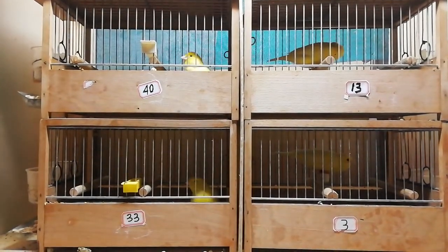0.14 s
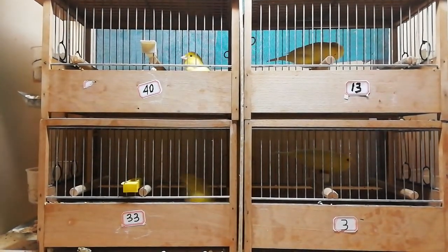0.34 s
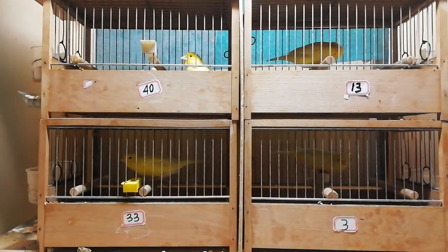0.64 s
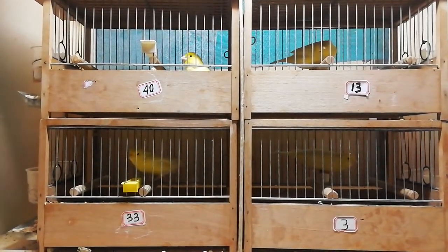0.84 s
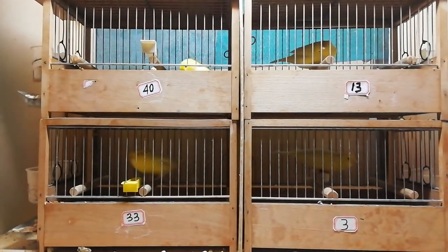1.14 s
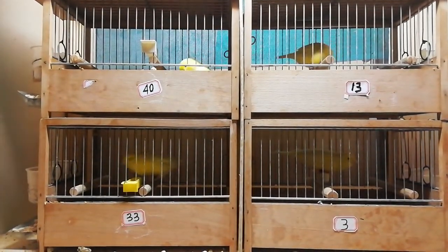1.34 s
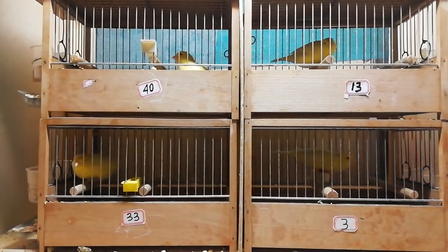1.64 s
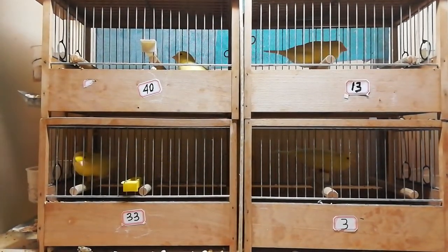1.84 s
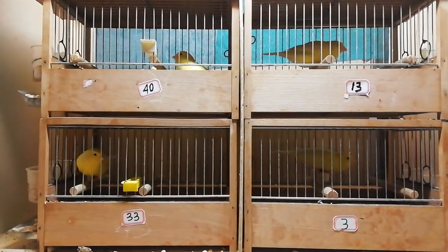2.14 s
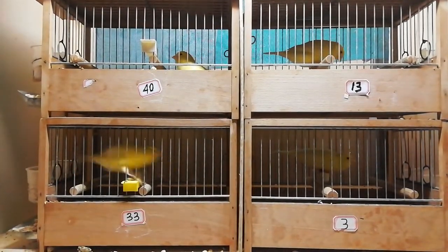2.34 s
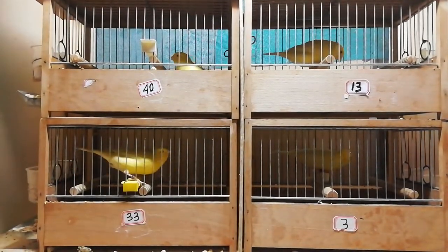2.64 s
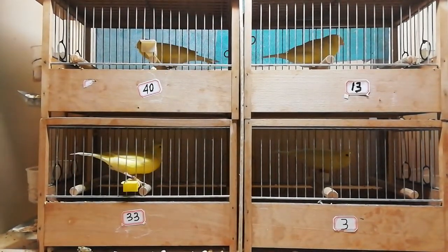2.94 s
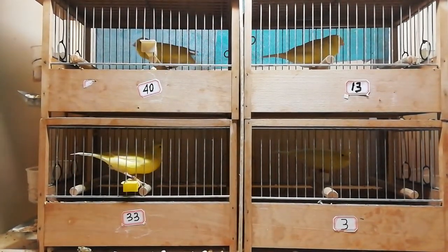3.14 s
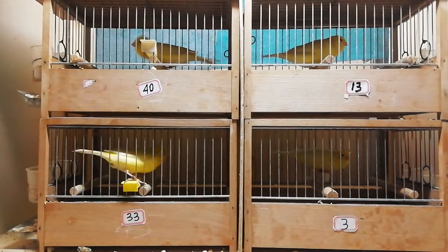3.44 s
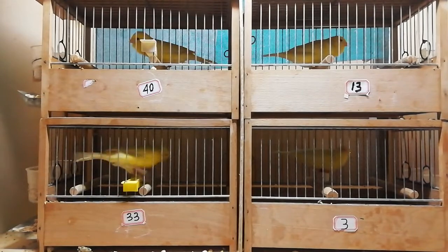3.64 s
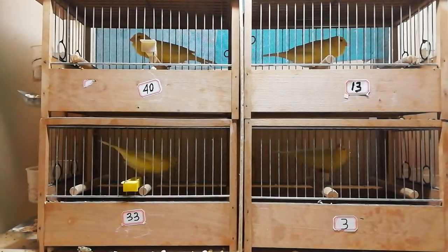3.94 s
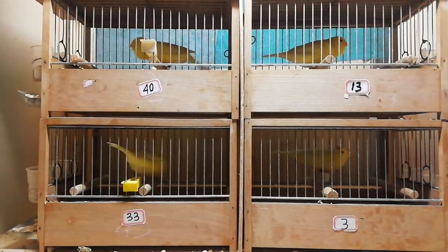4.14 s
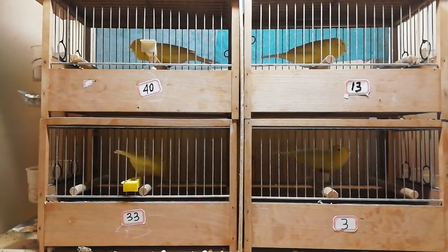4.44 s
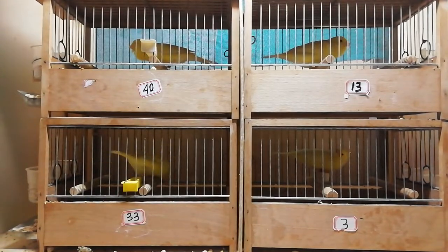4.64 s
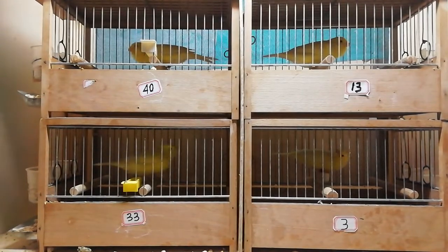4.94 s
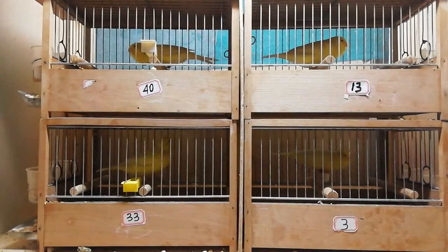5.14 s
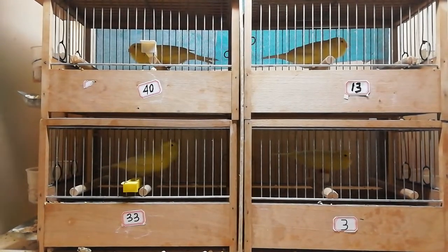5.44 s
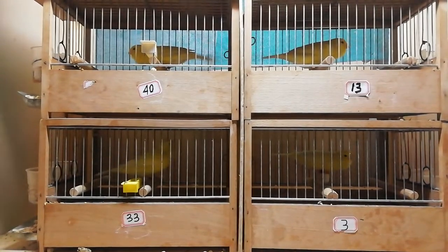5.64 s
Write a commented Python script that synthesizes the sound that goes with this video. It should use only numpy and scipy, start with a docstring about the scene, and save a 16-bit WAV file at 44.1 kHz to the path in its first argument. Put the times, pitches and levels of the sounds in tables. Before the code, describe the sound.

Quiet small-room air with a faint low rumble and mains hum. From about 0.4 to 0.8 s a canary's wings rustle briefly and its feet tap wood and wire. At 0.9-1.1 s comes a quick cluster of short, sliding chirps. Knocks follow at 1.3-1.9 s, the strongest near 1.65 s with a thin wire ring, then more chirps until 2.2 s. A busy flurry of hops, scrapes and feathers fills 2.25-2.5 s, with a few isolated chirps after it. At 3.0 s a fast trill of whistled notes around 2 kHz fades in; higher even pips join from 3.3 to 3.85 s. From 3.9 s hollow, lower notes from a third bird overlap, with a burst of quick notes near 4 s. The dense roll peaks around 4-4.9 s over soft cage thuds, drops lower and softer after 5.2 s, then strengthens again and continues to the end, near 5.8 s.

```python
"""A low rumble and a mains hum lie under faint room air, with hops on perch and wire and calls among them.
Three canaries in stacked wooden cages then trill over each other, heard at two microphone ports nearby.
Songs and calls are gliding near-sines with overtones; struck wood and wire ring as decaying modes.
Wings are noise in grains and a low boom; a diffuse tail lets the small room ring on."""
import sys
import numpy as np
from scipy import signal
from scipy.fft import rfft, irfft
from scipy.io import wavfile
from scipy.ndimage import uniform_filter1d

SR = 44100
rng = np.random.default_rng(int(sys.argv[2]) if len(sys.argv) > 2 else 0)


def bounce(signal):
    """Save signal as a 16-bit WAV file at the path given by the first command-line argument."""
    frames = np.transpose(np.atleast_2d(signal))
    limited = np.clip(frames, -1, 1)
    pcm = np.round(limited * 32767).astype(np.int16)
    wavfile.write(sys.argv[1], SR, pcm)


N = 254898

# Spectrum of the room air: pitch_hz, relative_db
AIR_COLOUR = [(100, -37), (170, -8), (202, 5.5), (331, -22.5), (432, -17), (466, -19), (681, -26),
              (749, -18), (872, -21.5), (1300, -19.5), (7770, -30.5), (16000, -37)]
AIR_DB = -68.5
# Rumble along time: time_s, level_db
RUMBLE_LEVEL = [(0, -71.5), (1.2, -70.5), (2.5, -69), (3.4, -70.5), (3.86, -63), (4.38, -70), (4.65, -63.5),
                (4.86, -59.5), (4.93, -69.5), (5.3, -66), (5.78, -65)]
# Spectrum of the rumble: pitch_hz, relative_db
RUMBLE_COLOUR = [(8.8, -29), (15, 26), (54, -6), (86, 5.5), (129, -5), (155, 1), (172, -5), (185, -5),
                 (240, -5), (410, -120)]
RUMBLE_SWELL_DB, RUMBLE_SWELL_S = 1.5, 0.094
# Mains partials: pitch_hz, level_db
MAINS_HUM = [(199.5, -68.5), (299.5, -83.5)]

# Reverberation time: pitch_hz, t60_s
ROOM_T60 = [(300, 0.42), (2000, 0.35), (9000, 0.22)]
ROOM_ONSET_S, ROOM_BUILD_S = 0.002, 0.0081  # the first walls answer late, then the tail builds up
ROOM_TILT_DB = -1.5  # per octave above 2 kHz: the tail is duller than the direct sound
SINGER_ROOM_DB, CALL_ROOM_DB, HOP_ROOM_DB = -8, -5.5, -4.5

# Wings brushing the cage: start_s, level_db, held_s, fade_db_per_s
WING_BRUSH = [(.438, -47.5, 0.0032, 313), (.502, -50, 0.0033, 216), (1.432, -66.5, .01, 80),
              (1.572, -63, 0.0046, 250), (1.86, -62.5, 0.077, 198), (2.272, -52.5, 0.043, 250),
              (2.428, -47.5, 0.0041, 282)]
# Wing strokes booming in the cage box: start_s, level_db, held_s, fade_db_per_s
WING_BOOM = [(.492, -82, .005, 400), (.538, -65, .005, 180), (2.272, -70, 0.05, 240),
             (2.476, -45, 0.002, 384), (3.78, -65.5, 0.12, 154), (4.09, -66, 0.04, 200)]
BRUSH_RISE_DB_PER_S, BOOM_RISE_DB_PER_S = 2500, 400
# Spectrum of rustling feathers: pitch_hz, relative_db
RUSTLE_COLOUR = [(290, -23), (500, 19), (595, -59), (831, 4.5), (2070, 3), (2810, -4.5), (8210, 0),
                 (16000, -34)]

# Feet and beak on perch, floor and wire: start_s, level_db, wire_ring_db,
# scrape_db (claws and seed), left_minus_right_db, knock_brightness_db_per_octave
HOPS = [(0.295, -89, -8, -30, 4, 2), (0.38, -65, -23.5, -14, 5, 2.5), (0.428, -53, -20, -10, -1, 1),
        (0.437, -49, -12, 13, 5, 6.5), (0.461, -52, -16, -14, 1, -3), (0.5011, -42.5, -9, 13, -1, 6),
        (0.61, -55.5, -0.5, -3, 1, 4.5), (0.621, -59, -22, -28, -3, -9), (0.676, -52, -25, -25, 0, -8.5),
        (0.822, -57, -23, -13, 4, -4), (1.296, -69, -16, 26, 1, 4), (1.376, -50, -16, -25, 1, -1),
        (1.392, -50, -25, -30, -1, -4), (1.425, -50, -26, -34, 1.5, 6.5), (1.453, -53, -29, -26, -13, -8),
        (1.569, -42.5, -8, -25, 0, -0.5), (1.648, -34, -1.5, -35, 0.5, -9),
        (1.854, -52.5, -6.5, -24, 2, -5), (2.267, -40.5, 3.5, -23, 0, 5), (2.288, -43, -20, -30, 6, -8),
        (2.306, -36, -1.5, -12, -2.5, -8), (2.325, -59, -20, -30, 7, -8), (2.345, -43, -20, -30, 3, -6),
        (2.365, -36, 1.5, -14, 1.5, 2.5), (2.3995, -42, 6, 20, -1.5, -8), (2.408, -45, -4, 22, -4, -2),
        (2.428, -52, -5.5, -3, -1, -0.5), (3.731, -49.5, -5, 31, 1, 9.5), (3.891, -38, -6, 17.5, -1, -5)]
# Modes of the wood: pitch_hz, level_db, t60_s
WOOD_MODES = [(825, -22, 0.089), (944, -4.5, 0.076), (1078, -7.5, 0.034), (1212, 1, 0.018),
              (1423, -7, 0.034), (1580, -4.5, 0.048), (2170, -22, 0.022), (2744, -11.5, 0.025),
              (3090, -5, 0.0092)]
# Modes of the wire: pitch_hz, level_db, t60_s
WIRE_MODES = [(4640, -3, 0.0035), (6100, -28, 0.34), (6450, -5.5, 0.012), (7820, -12.5, 0.065),
              (8030, -20.5, 0.11), (9000, -25, 0.2)]
CONTACT_S = .0025  # decay time of a foot's push
# A mode's twin over its pitch, scatter of that ratio, scatter of a mode's level in dB
TWIN_RATIO, TWIN_SCATTER, MODE_SCATTER_DB = 1.012, .004, 2
# Soft landings booming in the cage box: start_s, level_db, pitch_hz
THUDS = [(0.514, -45.5, 466), (.83, -62.5, 468), (1.571, -45, 483), (1.594, -44, 274), (1.857, -55, 489),
         (2.29, -52, 340), (2.37, -51, 390), (2.43, -49, 294), (3.815, -47, 479), (3.906, -54, 506),
         (4.069, -41, 497), (4.116, -52.5, 424), (4.21, -56, 510), (4.459, -52, 457), (4.804, -49.5, 447),
         (5.144, -50.5, 470), (5.382, -56, 490), (5.699, -73, 444)]
THUD_GRAIN_DB = -8.5  # rattle of the floor around the pitch of a landing
# Loose wires of the cage front humming on: start_s, level_db, pitch_hz
LOOSE_WIRES = [(.503, -73, 1900), (1.578, -63, 1910), (1.655, -55.5, 1882), (1.65, -63, 6230),
               (1.862, -66, 1940), (2.27, -64, 6100)]
LOOSE_T60_S, LOOSE_BEAT_HZ = .55, 21.9

# Calls and other short chirps: start_s, level_db, end_pitch_hz, length_ms, start_over_end_pitch, bend,
# octave_db, left_minus_right_db
CALLS = [(0, -63, 1200, 32, 1.5, 1.85, -23, -4), (.01, -72, 1894, 67, 1, 1.3, -15, 7),
         (.917, -43.5, 2477, 84, 0.93, 9.2, -16.5, 5), (0.958, -36.5, 2160, 19, 1.1, 0.83, -18, 11),
         (0.984, -36.5, 2540, 22.5, 0.89, 1.4, -21, 6), (0.999, -38.5, 1570, 7.4, 1.43, 1.22, -6.5, -7),
         (1.021, -39, 2340, 21, 0.88, 5.1, -21, -2.5), (1.032, -41, 1232, 13, 1.7, 6.4, -13, 13),
         (1.065, -37.5, 1947, 9.2, 1.08, 0.64, -10.5, 5), (1.074, -38, 1228, 10.2, 1.44, 4.2, -11, 8.5),
         (1.871, -61, 1126, 12.6, 2, 1.9, -19, -25), (1.896, -52.5, 1860, 30.4, 0.66, 4.8, -6.5, -22),
         (1.941, -39.5, 2140, 22.4, 0.52, 2.63, -5.5, 6.5), (1.99, -42, 2565, 31, 1.01, 1, -15, 5.5),
         (2.024, -58, 2650, 46, 1.07, 1.4, -37, 19), (2.156, -40.5, 1690, 11, 0.88, 1.14, 6, -3.5),
         (2.165, -36, 2212, 22.8, 0.79, 4.6, -3, -9), (2.258, -50, 2200, 22, .98, 1.5, -20, -2),
         (2.438, -38.5, 2080, 13.4, 0.93, 1.5, -16, 8), (2.463, -49, 1472, 44, 1.26, 0.6, -11, 6),
         (2.612, -49.5, 1872, 33, 1.1, 5, -7.5, 6), (2.928, -62, 2540, 12.5, 1.13, 2.7, -10, -16),
         (3.213, -41.5, 1810, 19, .9, 1.6, -14, -1), (3.865, -35.5, 2030, 16.7, 0.81, 2.05, -0.5, -5)]
# Third and higher partials of a call: level_db
CALL_UPPER_DB = [-21, -25.5, -69]
CALL_LAG = 30  # samples by which the left port lags
BREATH_BAND = signal.butter(3, [2600, 9800], "band", fs=SR)

# A trill is a curve through some of its notes; each *_NUMBER lists the note number of every row,
# and the notes in between follow evenly.
# First singer, main note of the syllable: start_s, level_db, pitch_hz
ROLL_CURVE = [(3.032, -48, 2160), (3.075, -43, 2000), (3.1123, -37.5, 1980), (3.236, -31.5, 2130),
              (3.3185, -29.5, 2170), (3.3985, -30.5, 2203), (3.6001, -27, 2127), (3.8106, -29, 2260),
              (3.8881, -29, 2290), (3.9255, -26, 2015), (3.9519, -25.5, 2167), (3.9948, -21.5, 2055),
              (4.035, -26, 2037), (4.1905, -22, 2053), (4.3865, -21, 2029), (4.592, -22.5, 2035),
              (4.804, -22.5, 2090), (4.8922, -24, 2175), (5.0128, -28.5, 2084), (5.2194, -31.5, 2065),
              (5.3137, -37, 1740), (5.49, -35, 1740), (5.578, -35, 1745), (5.621, -29.5, 1726),
              (5.664, -26, 1794), (5.708, -29, 1890), (5.7505, -27, 1910)]
ROLL_NUMBER = [0, 1, 2, 5, 7, 9, 14, 19, 21, 22, 23, 24, 25, 29, 34, 39, 44, 46, 49, 54, 56, 60, 62, 63, 64,
               65, 66]
# Shape of the syllable along the song: time_s, main_note_ms, start_over_end_pitch,
# bend (under 1 the glide comes late), flick_db (high flick against the cluck), cluck_brightness_db_per_partial
ROLL_SHAPE = [(3.03, 14, 1.1, 1.1, -30, 4), (3.08, 13, 1.07, 1.1, -30, 2), (3.115, 11, 1.1, 1.2, -30, 0),
              (3.155, 12, 1.02, 2, -30, -2), (3.199, 13, 0.92, 2.5, -30, -4), (3.24, 13, .75, 5, -30, -8),
              (3.316, 12, 0.6, 6, -30, -14), (3.848, 12.4, .55, 3.13, -26, -13),
              (3.952, 12, 0.84, 2, -3, -7.5), (4.11, 9, 0.85, 2, -3, -6), (4.19, 9.5, 0.86, 2, -2, -5),
              (4.23, 11.5, 0.87, 2, -2, -5), (4.5, 11.5, 0.85, 2.75, -1, -3),
              (5.201, 13.2, 0.613, 1.22, 8, 0), (5.301, 13, 1.03, 1.4, -37, -5),
              (5.62, 12, 1.02, 1.4, -37, -5.5), (5.78, 16, 0.97, 2.3, -30, -5)]
# First singer's throat along the song: time_s, main_note_octave_db, lead_in_db
ROLL_THROAT = [(3.03, -42, -35), (3.08, -0.5, -21), (3.12, 1.5, -20), (3.28, -11.5, -15),
               (3.45, -15.5, -11.5), (3.82, -12.5, -14), (3.9, -17, -8), (4.6, -23, -11.5),
               (5.0, -19.5, -7), (5.25, -2, 2.5), (5.35, -5, 8), (5.78, -9.5, -5)]
# First singer, short falling cluck closing a syllable: start_s, level_db, fundamental_db
CLUCK_CURVE = [(3.815, -38, -2.5), (3.896, -40.5, -2), (3.938, -48, 9), (4.101, -44, 7), (4.373, -46, 6),
               (4.621, -45, 1), (4.873, -49.5, -9), (5.07, -51, 3.5), (5.21, -60, 7), (5.29, -43, 7),
               (5.331, -42, 2), (5.46, -42, 3), (5.548, -42, 4.5), (5.632, -42, 2), (5.759, -42.5, 5.5)]
CLUCK_NUMBER = [0, 2, 3, 7, 14, 20, 26, 30, 33, 35, 36, 39, 41, 43, 46]
# Second singer, high even notes: start_s, level_db, pitch_hz
PIPE_CURVE = [(3.317, -34.5, 2276), (3.511, -27.5, 2389), (3.853, -26, 2345)]
PIPE_NUMBER = [0, 4, 11]
# Second singer, burst of quick low notes: start_s, level_db, pitch_hz
QUICK_CURVE = [(3.975, -29, 2000), (4.015, -30, 2100), (4.057, -33, 1905), (4.096, -29, 1965),
               (4.133, -30.5, 1930)]
QUICK_NUMBER = [0, 1, 2, 3, 4]
# Third singer, hollow notes with a strong octave: start_s, level_db, pitch_hz, length_ms,
# octave_over_fundamental_db
BELL_CURVE = [(3.905, -34, 1417, 22, 9.5), (3.947, -32, 1345, 23, 4.5), (4.09, -33, 1280, 25, 4.5),
              (4.135, -30.5, 1266, 17, 0), (4.405, -31.5, 1284, 26, 7), (4.542, -30, 1340, 12.4, 2),
              (4.676, -30.5, 1322, 25, 5.5), (4.8175, -32, 1274, 20, 6.5), (4.955, -29, 1310, 15.7, 4.5),
              (5.1928, -32.5, 1324, 31.7, 3.5), (5.24, -31.5, 1380, 32.6, 9.5), (5.288, -24, 1357, 16, 1),
              (5.3846, -35, 1326, 34, 3.5), (5.5313, -33, 1344, 24.6, 7.5), (5.628, -30, 1319, 11, 7.5),
              (5.676, -28.5, 1288, 19, 7), (5.723, -33, 1272, 27.6, 12.5)]
BELL_NUMBER = [0, 1, 4, 5, 11, 14, 17, 20, 23, 28, 29, 30, 32, 35, 37, 38, 39]
# Third singer's throat along the song: time_s, third_partial_db, closing_flick_db
BELL_THROAT = [(3.9, -13, -9), (4.2, -16, -14), (4.6, -9.5, -17), (5.0, -11.5, -13), (5.25, -11.5, -10.5),
               (5.5, -11, -7), (5.62, -11, -8), (5.78, -14, -17)]
# Partials, level_db: roll from the third, cluck from the second, lead-in, pipe and quick from the first;
# bell has the fundamental, then the fourth and above
ROLL_UPPER_DB = [-26.5, -23.5, -47.5, -63]
CLUCK_UPPER_DB = [16, 13.5, -1, -60]
LEAD_PARTIALS_DB = [-4, -10.5, -26.5]
PIPE_PARTIALS_DB = [-3, -29.5, -25, -48, -56]
QUICK_PARTIALS_DB = [-0.5, -11.5, -22, -18]
BELL_PARTIALS_DB = [-8.5, -25.5, -23.5, -28]
STRAY_S, STRAY_DB, STRAY_SHARE = .0007, 1.6, .01  # scatter of a note: time, level, share of the third column
STEADY = .004  # pitch wobble (share) of held whistles
# Each singer's place: left_lag_samples, wall_echo_delay_s (right port), wall_echo_db, room_left_minus_right_db
PLACES = [(28, .017, -14, -2.5), (-28, .012, -14, -1.5), (30, .014, -16, -4)]
# Where each head points: time_s, then direct left_minus_right_db of first, second, third singer
FACING = [(3.0, -4.5, 4, -7), (3.8, 0, 4, -27), (3.95, 2, 4, -1.5), (4.4, 0, 4, -5), (4.6, 1, 4, -2),
          (5.2, -0.5, 4, -0.5), (5.6, 11.5, 4, -10), (5.72, -2.5, 4, -1)]
SWAY_PER_S = 5  # how often a singing head moves enough to change what the room returns

# Colour of the two ports: resonance_hz, sharpness_q, share_added_left, share_added_right
PORT_COLOUR = [(8170, 3.6, -0.57, 1), (4700, 3.3, 0.29, -0.2), (1180, 0.65, -0.43, -0.018)]
TOP_HZ = 15900


def undb(db):
    """Gain is the antilogarithm of a level in decibels."""
    return 10 ** (np.asarray(db) / 20)


def add(out, s, x):
    """Superposition: x is summed into out from time s."""
    i = max(int(s * SR), 0)
    out[..., i:i + x.shape[-1]] += x[..., :out.shape[-1] - i]


def pan(db):
    """Level difference: left minus right in dB is split evenly over both gains."""
    return undb([[db / 2], [-db / 2]])


def along(table, s):
    """Linear interpolation of every column of a table over its first."""
    at, *columns = np.transpose(table)
    return [np.interp(s, at, column) for column in columns]


def decay(t, t60):
    """Exponential decay: the level falls by 60 dB in t60."""
    return 1000 ** (-t / t60)


def band(x, lo_hz, hi_hz):
    """Band limitation by a second-order Butterworth band-pass."""
    return signal.lfilter(*signal.butter(2, [lo_hz, hi_hz], "band", fs=SR), x)


def coloured(table, lo_hz, hi_hz):
    """Interaural coherence: shaped noise, rms 1, alike in the bass and unrelated in the treble."""
    f = np.fft.rfftfreq(N, 1 / SR) + 1e-9
    hz, db = np.transpose(table)
    gain = undb(np.interp(np.log(f), np.log(hz), db)) * (f > lo_hz) * (f < hi_hz)
    mid, side = rfft(rng.standard_normal((2, N))) * gain
    side = side * np.clip((f / 450) ** 2, .05, 1)
    x = irfft(np.array([mid + side, mid - side]), N)
    return x / x.std()


def room(x, db):
    """Diffuse reverberation: each ear has its own noise tail, whose octave bands die at their own rate."""
    t, tail = np.arange(SR // 2) / SR, 0
    hz, t60 = np.transpose(ROOM_T60)
    for f in 140 * 2. ** np.arange(7):
        edges = [f / np.sqrt(2), f * np.sqrt(2)]
        octave = signal.butter(2, edges, "band", fs=SR, output="sos")
        noise = signal.sosfilt(octave, rng.standard_normal((2, len(t))))
        tilt = undb(ROOM_TILT_DB * max(np.log2(f / 2000), 0))
        tail = tail + tilt * noise * decay(t, np.interp(np.log(f), np.log(hz), t60))
    tail = tail * np.clip((t - ROOM_ONSET_S) / ROOM_BUILD_S, 0, 1)
    tail = tail / np.sqrt(np.sum(tail ** 2) / 2)
    return signal.fftconvolve(x, undb(db) * tail, axes=1)[:, :N]


def floor():
    """Background: steady room air, a rumble that rises and falls, and wavering mains partials."""
    t = np.arange(N) / SR
    waver_db = 2.5 * uniform_filter1d(rng.standard_normal(N), 1500) * np.sqrt(1500)
    hum = sum(undb(db) * np.sqrt(2) * np.sin(2 * np.pi * hz * t) for hz, db in MAINS_HUM)
    span = int(RUMBLE_SWELL_S * SR)
    swell = uniform_filter1d(uniform_filter1d(rng.standard_normal(N), span), span)
    rumble_db = along(RUMBLE_LEVEL, t)[0] + RUMBLE_SWELL_DB * swell / swell.std()
    rumble = undb(rumble_db) * coloured(RUMBLE_COLOUR, 33, 190)
    return undb(AIR_DB) * coloured(AIR_COLOUR, 210, 17000) + rumble + undb(waver_db) * hum


def strokes(table, rise_db_per_s):
    """Exponential envelopes: each stroke rises, holds and fades at constant dB per second."""
    t = np.arange(N) / SR
    gain = 0
    for s, db, held, fade in table:
        rise_db = rise_db_per_s * np.clip(s - t, 0, None)
        fade_db = fade * np.clip(t - s - held, 0, None)
        gain = gain + undb(db - rise_db - fade_db)
    return gain


def wings():
    """Friction and resonance: feathers rustle in small grains, pushed air booms in the cage box."""
    grain = undb(24.0 * uniform_filter1d(rng.standard_normal(N), 100))
    brush = strokes(WING_BRUSH, BRUSH_RISE_DB_PER_S) * grain * coloured(RUSTLE_COLOUR, 580, 16500)
    boom = np.sin(2 * np.pi * 159 * np.arange(N) / SR) * np.sqrt(2)
    return brush + uniform_filter1d(strokes(WING_BOOM, BOOM_RISE_DB_PER_S), 400) * boom


def ring(modes, chance, push, tilt_db=0):
    """Modal response: a push rings decaying modes of scattered level, each beating with a close twin."""
    t = np.arange(SR // 3) / SR
    body = 0
    for (hz, db, t60), c in zip(modes, chance):
        gain = undb(db + MODE_SCATTER_DB * c + tilt_db * np.log2(hz / 1000))
        twin_hz = hz * (TWIN_RATIO + TWIN_SCATTER * c)
        pair = np.sin(2 * np.pi * hz * t) + 0.23 * np.sin(2 * np.pi * twin_hz * t)
        body = body + gain * pair * decay(t, t60)
    return signal.fftconvolve(push, body[None], axes=1)[:, :len(t)]


def clatter(blow, chance, spread_s=0.055, drop_db=-13):
    """Repeated impact: toes and a loose perch strike again, each weaker than the first blow, later ones mostly more so."""
    out = blow.copy()
    for when, size in chance:
        add(out, spread_s * when, undb(drop_db * (when + size)) * blow)
    return out


def hops():
    """Impact excitation: each landing knocks the wood, rings the wires and scatters a short scrape."""
    out, t = np.zeros((2, N)), np.arange(SR // 3) / SR
    short = SR // 50
    for s, db, wire_db, scrape_db, pan_db, tilt_db in HOPS:
        chance, noise = rng.standard_normal((2, 10)), rng.standard_normal((2, len(t)))
        crack = noise * np.clip(t / 0.0061, 0, 1) * (decay(t, 0.012) + 0.089 * decay(t, 0.09))
        scrape, dull = band(crack, 5000, 9800), band(crack, 760, 3400)
        push = noise[:, ::-1][:, :short] * np.exp(-t[:short] / CONTACT_S)
        push = band(push.mean(axis=0) + 0.4 * push, 550, 9000)  # mostly common to both ports
        push = push / np.sqrt(np.sum(push ** 2) / 2)
        blow = undb(-7.0) * ring(WOOD_MODES, chance[0], push, tilt_db) + undb(14.5) * dull
        blow = blow + undb(wire_db) * ring(WIRE_MODES, chance[1], push) + undb(scrape_db) * scrape
        add(out, s, pan(pan_db) * undb(db) * clatter(blow, rng.random((4, 2))))
    return out


def thuds():
    """Cavity resonance: a soft landing booms as a decaying sine with noise around its pitch."""
    out, t = np.zeros((2, N)), np.arange(SR // 3) / SR
    for s, db, hz in THUDS:
        grain = band(rng.standard_normal((2, len(t))), hz * 0.63, hz * 1.61)
        boom = np.sin(2 * np.pi * hz * t) + undb(THUD_GRAIN_DB) * grain / grain.std()
        add(out, s, pan(-6.0) * undb(db) * boom * np.clip(t / 0.0073, 0, 1) * decay(t, 0.085))
    return out


def loose_wires():
    """Beating: two close sines hum on with a slow decay in a loose wire."""
    out, t = np.zeros((2, N)), np.arange(SR // 3) / SR
    for s, db, hz in LOOSE_WIRES:
        pair = np.sin(2 * np.pi * hz * t) + .6 * np.sin(2 * np.pi * (hz + LOOSE_BEAT_HZ) * t)
        ends = np.clip(t / 0.0066, 0, 1) * np.clip((t[-1] - t) / .1, 0, 1)
        add(out, s, pan(0.0) * undb(db) * pair * ends * decay(t, LOOSE_T60_S))
    return out


def landings():
    """Direct and reverberant sound of everything that strikes the cages."""
    struck = hops() + thuds() + loose_wires()
    return struck + room(struck, HOP_ROOM_DB)


def note(hz, ms, start, overtones_db, bend=1.49, anchor=1, point=1, peak=0.42, unsteady=0.14, air_db=-30):
    """Syrinx phonation: one puff is a gliding, unsteady sine with overtones and a little air noise."""
    u = np.linspace(0, 1, int(ms * SR / 1000))
    shake, hiss = rng.standard_normal((2, 4500))[:, :len(u)]
    shake = unsteady * 8 * uniform_filter1d(shake, 64)  # the 8 undoes the smoothing's loss
    # hz is reached at the share anchor of the length
    glide = start ** ((1 - u) ** bend - (1 - anchor) ** bend)
    phase = 2 * np.pi * np.cumsum(hz * glide * (1 + shake)) / SR
    # short notes swell to a point at the share peak, long ones hold
    arch = np.sin(np.pi * u ** (np.log(.5) / np.log(peak)))
    swell = np.clip(arch * max(ms / 22, 1), 0, 1) ** point
    tone = sum(undb(db) * np.sin((k + 1) * phase) for k, db in enumerate(overtones_db))
    return swell * (tone + undb(air_db) * signal.lfilter(*BREATH_BAND, hiss))


def calls():
    """Frequency glides: calls and other short chirps, a fading one at the start and a lead-in within the trill."""
    out = np.zeros((2, N))
    for s, db, hz, ms, start, bend, octave_db, pan_db in CALLS:
        # wide glides are rougher than held notes
        unsteady = STEADY * abs(np.log(start)) * 15 + 0.0068
        chirp = note(hz, ms, start, [0, octave_db, *CALL_UPPER_DB], bend, unsteady=unsteady, air_db=-21.5)
        add(out, s, pan(pan_db) * undb(db) * chirp)
    out[0] = np.roll(out[0], CALL_LAG)
    return out + room(out[1:], CALL_ROOM_DB)


def trill(curve, number):
    """Quasi-periodic repetition: even steps between the rows of a curve, each note straying a little."""
    count = number[-1] + 1
    rows = np.array([np.interp(np.arange(count), number, column) for column in np.transpose(curve)])
    chance = rng.standard_normal((count, 3)).T
    rows[0] += STRAY_S * chance[0]
    rows[1] += STRAY_DB * chance[1]
    # the third column strays by a share: pitch, or the cluck's fundamental level
    rows[2:3] *= 1 + STRAY_SHARE * chance[2]
    return rows.T


def place(x, which):
    """Precedence: direct sound reaches one port first; a near wall and the room follow as the head sways."""
    lag, echo_s, echo_db, room_pan_db = PLACES[which]
    t = np.arange(N) / SR
    facing_db = along(FACING, t)[which]
    direct = undb([facing_db / 2, -facing_db / 2]) * np.array([np.roll(x, int(lag)), x])
    direct[1] += undb(echo_db) * np.pad(x, (int(echo_s * SR), 0))[:N]
    # the sway shares the sound between two unrelated tails
    turns = rng.random(int(t[-1] * SWAY_PER_S) + 2)
    sway = 2 * np.pi * np.interp(t * SWAY_PER_S, np.arange(len(turns)), turns)
    tails = room((x * np.cos(sway))[None], SINGER_ROOM_DB) + room((x * np.sin(sway))[None], SINGER_ROOM_DB)
    return direct + pan(room_pan_db) * tails


def first_singer():
    """Compound syllables: a low lead-in and a gliding main note, then a high flick and a falling cluck."""
    out = np.zeros(N)
    for s, db, hz in trill(ROLL_CURVE, ROLL_NUMBER):
        octave_db, lead_db = along(ROLL_THROAT, s)
        ms, start, bend = along(ROLL_SHAPE, s)[:3]
        main = note(hz, ms, start, [0, octave_db, *ROLL_UPPER_DB], bend, anchor=0.565, peak=0.43,
                    point=1.5, unsteady=.03, air_db=-29.5)
        add(out, s - .003, undb(db) * main)
        add(out, s - .012, undb(db + lead_db) * note(1545, 9.5, 0.788, LEAD_PARTIALS_DB, air_db=-17.0))
    for s, db, low_db in trill(CLUCK_CURVE, CLUCK_NUMBER):
        flick_db, bright_db = along(ROLL_SHAPE, s)[3:]
        overtones_db = np.array([low_db, *CLUCK_UPPER_DB]) + bright_db * np.arange(5)
        cluck = note(744.7, 9.33, 1.71, overtones_db, unsteady=0.081, air_db=-4.5)
        add(out, s - .003, undb(db) * cluck)
        add(out, s - .016, undb(db + flick_db) * note(3427, 14.5, .92, [0, -20]))
    return out


def second_singer():
    """Nearly pure tones: high even notes, and a burst of quick lower ones with a rising glide."""
    out = np.zeros(N)
    for s, db, hz in trill(PIPE_CURVE, PIPE_NUMBER):
        add(out, s - .004, undb(db) * note(hz, 22.7, 0.96, PIPE_PARTIALS_DB, unsteady=STEADY, air_db=-22))
    for s, db, hz in trill(QUICK_CURVE, QUICK_NUMBER):
        quick = note(hz, 12.6, 0.77, QUICK_PARTIALS_DB, anchor=0.52, unsteady=0.05, air_db=-21)
        add(out, s - .005, undb(db) * quick)
    return out


def third_singer():
    """Partial balance: a strong octave makes the notes hollow, and an upward flick ends each."""
    out = np.zeros(N)
    low_db, *upper_db = BELL_PARTIALS_DB
    for s, db, hz, held_ms, octave_db in trill(BELL_CURVE, BELL_NUMBER):
        third_db, end_db = along(BELL_THROAT, s)
        flick = note(4025, 8.4, .68, [0, -25], bend=1.2, unsteady=0.034)
        add(out, s - .008 + held_ms / 1000, undb(db + end_db) * flick)
        bell = note(hz, held_ms, .98, [low_db, low_db + octave_db, third_db, *upper_db],
                    anchor=0.63, peak=0.54, unsteady=0.023, air_db=-21.0)
        add(out, s - .003, undb(db) * bell)
    return out


def singers():
    """Spatial separation: three trilling birds, each heard from its own place."""
    return place(first_singer(), 0) + place(second_singer(), 1) + place(third_singer(), 2)


def scene():
    """Superposition of everything that reaches the two ports."""
    return floor() + wings() + landings() + calls() + singers()


def record(dry):
    """Port resonance: each port has its own colour, the right one resonant in the treble; the top is cut."""
    wet = dry
    for hz, sharp, left, right in PORT_COLOUR:
        resonance = signal.lfilter(*signal.iirpeak(hz, sharp, fs=SR), dry)
        wet = wet + np.array([[left], [right]]) * resonance
    return signal.sosfilt(signal.ellip(10, .2, 70, TOP_HZ, fs=SR, output="sos"), wet)


dry = scene()
out = record(dry)
bounce(out)
```